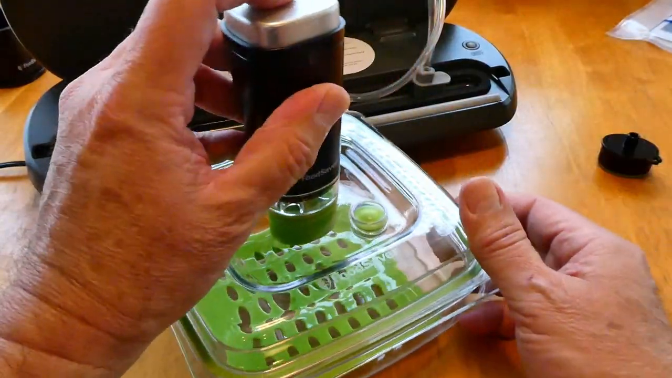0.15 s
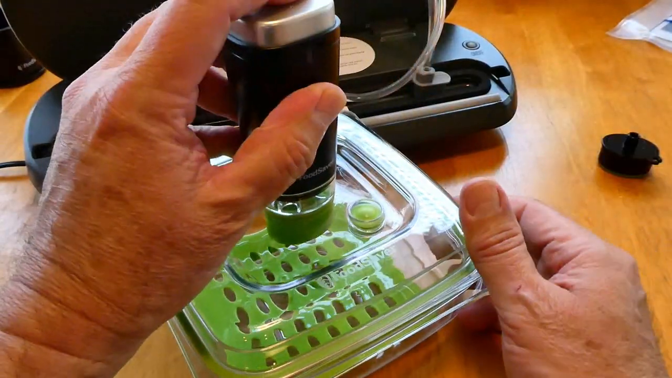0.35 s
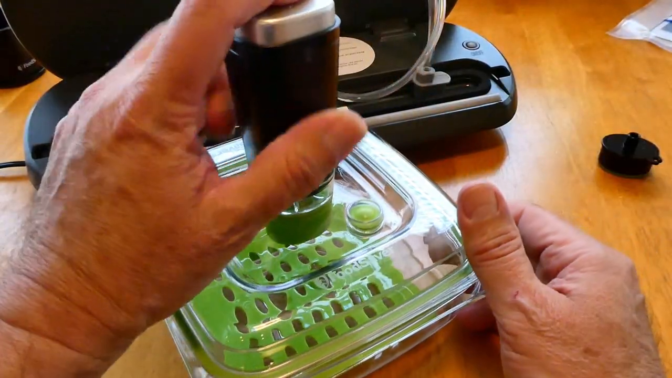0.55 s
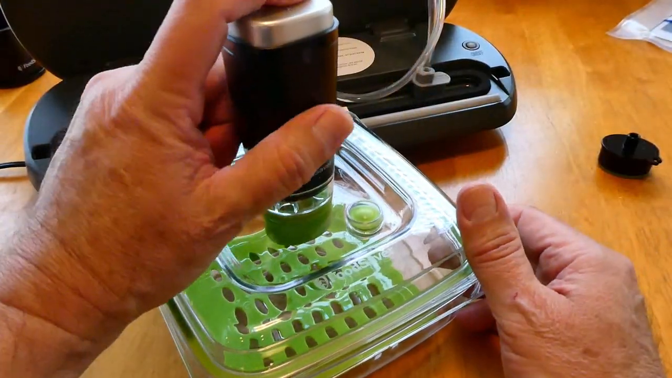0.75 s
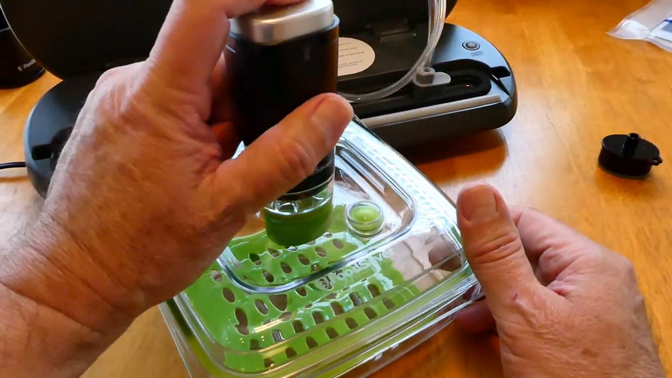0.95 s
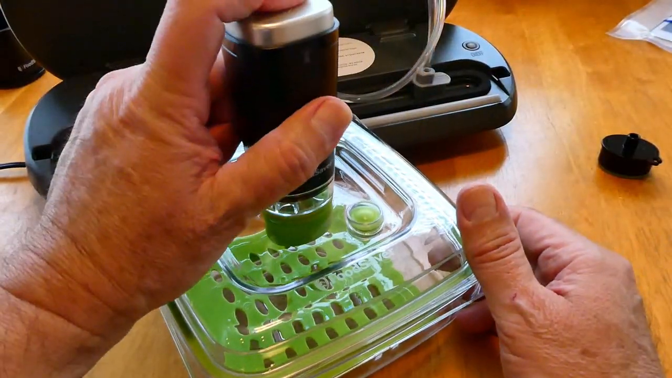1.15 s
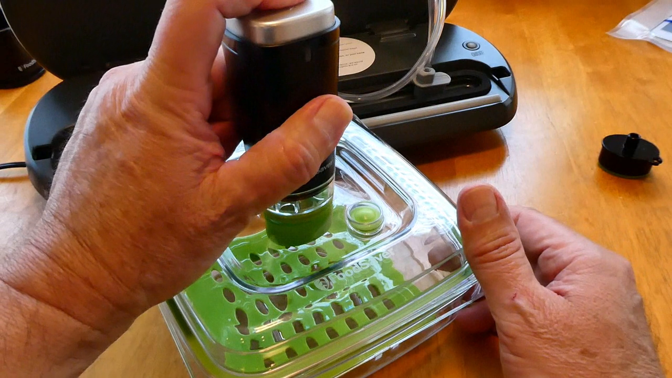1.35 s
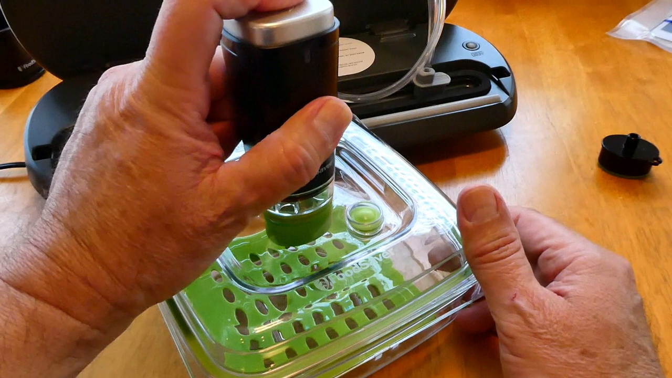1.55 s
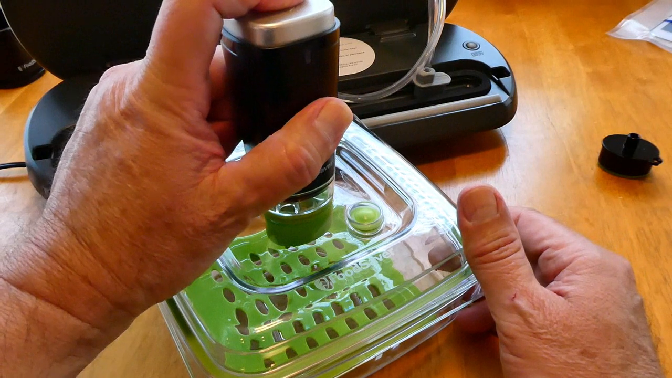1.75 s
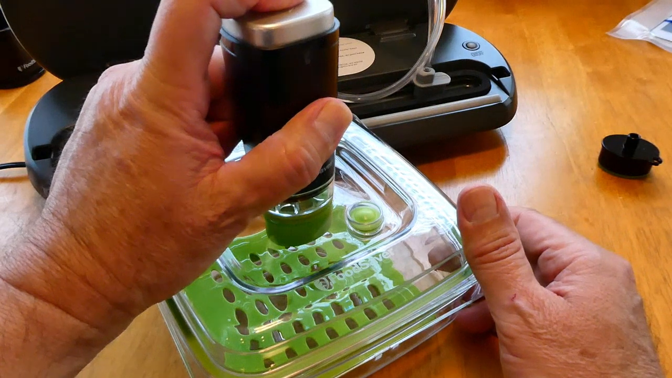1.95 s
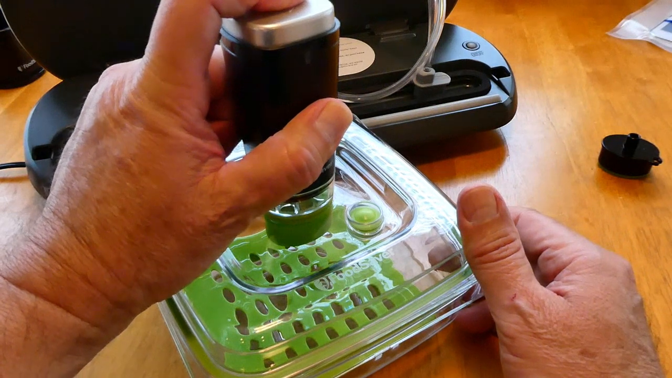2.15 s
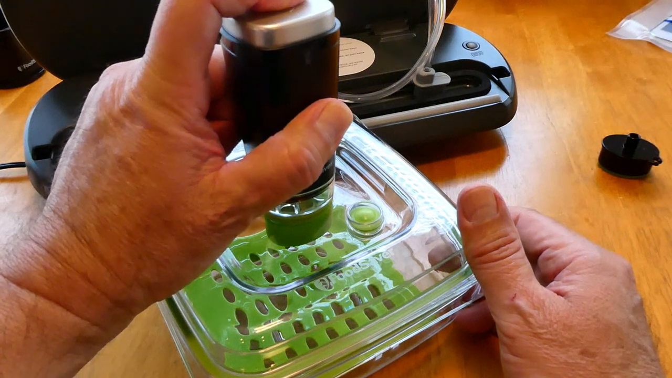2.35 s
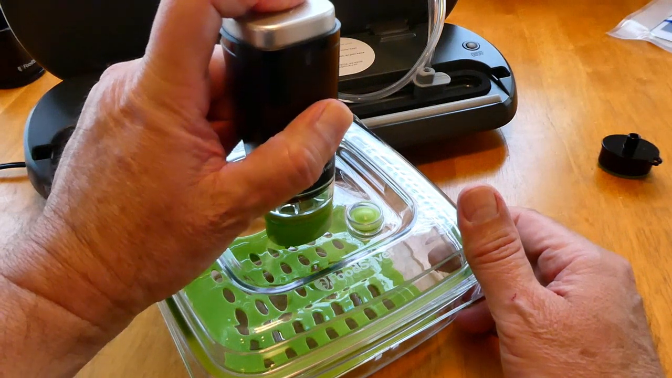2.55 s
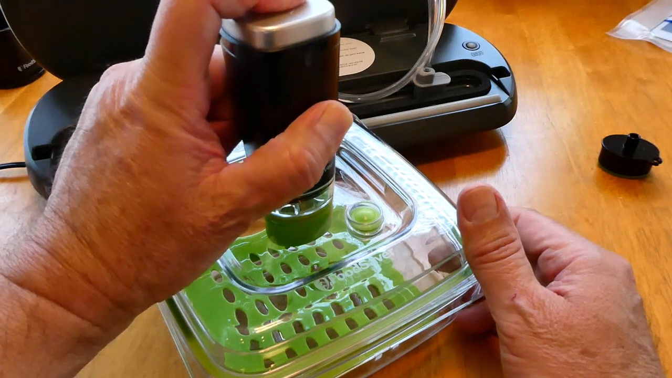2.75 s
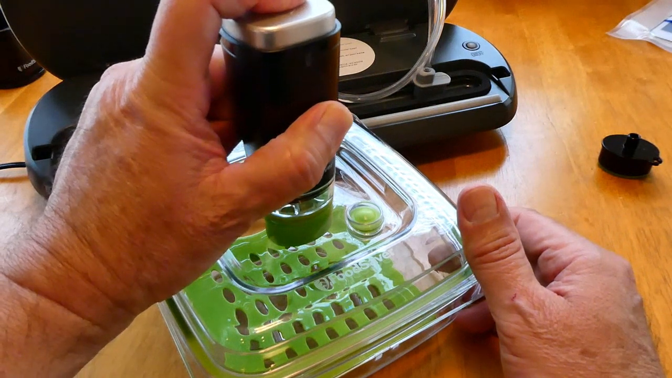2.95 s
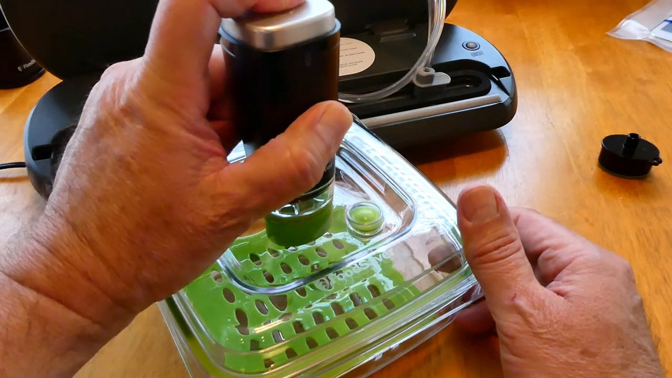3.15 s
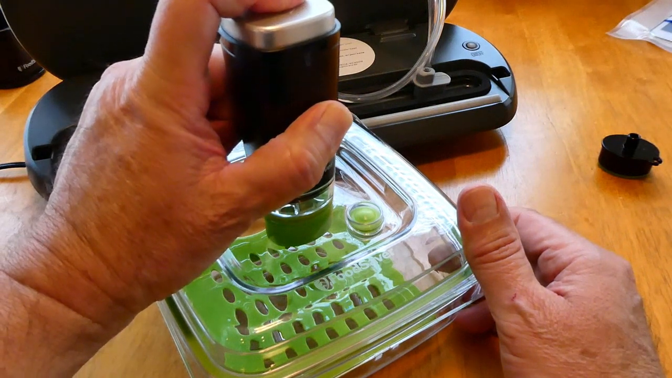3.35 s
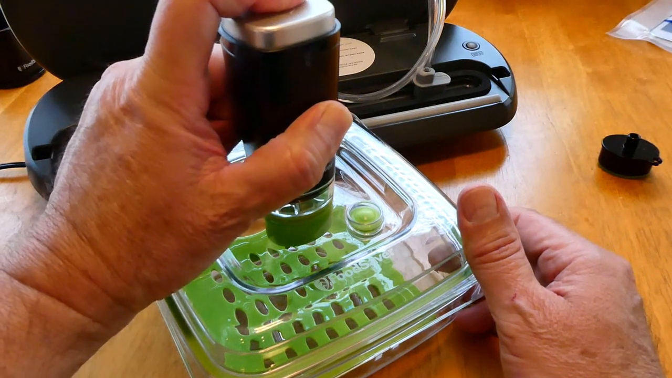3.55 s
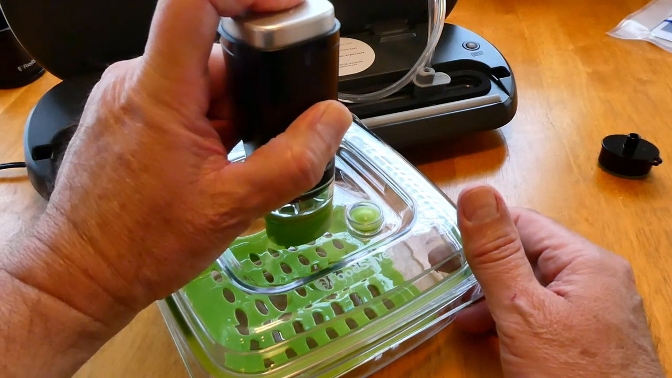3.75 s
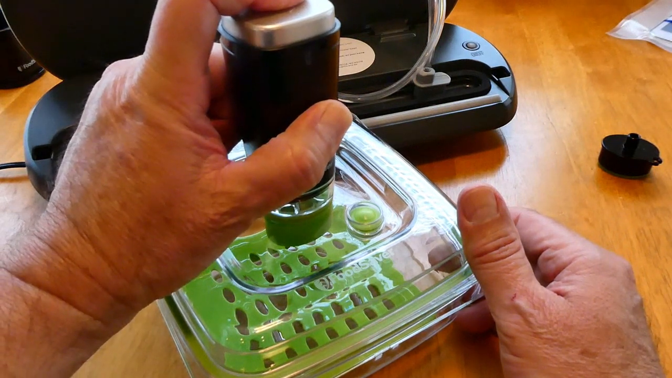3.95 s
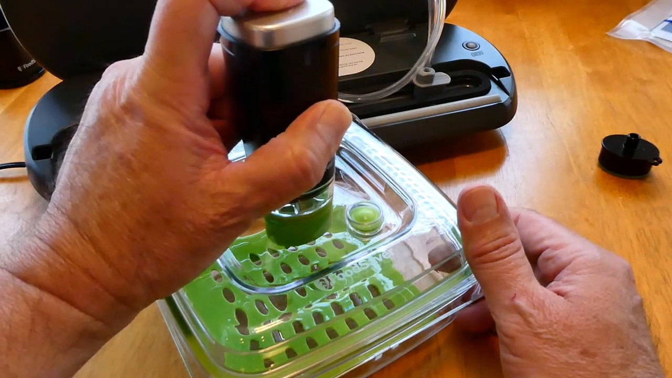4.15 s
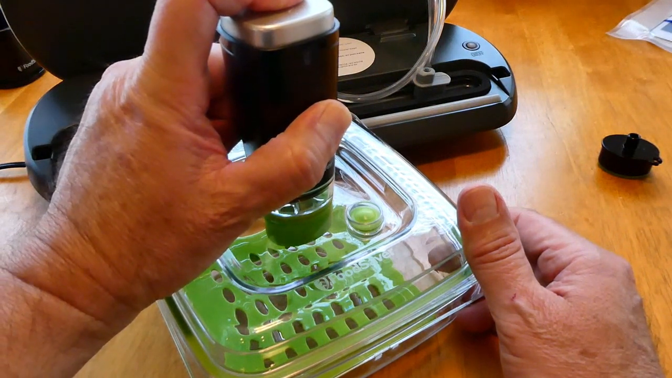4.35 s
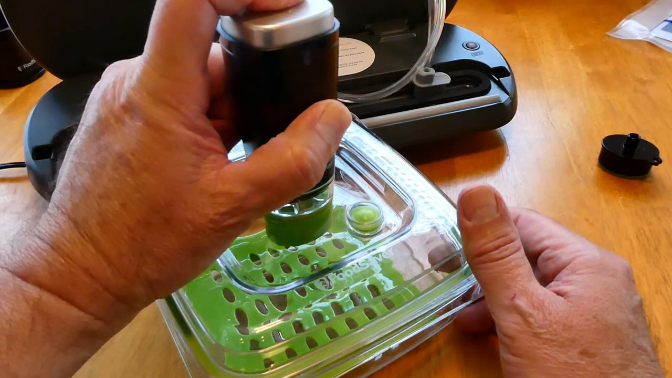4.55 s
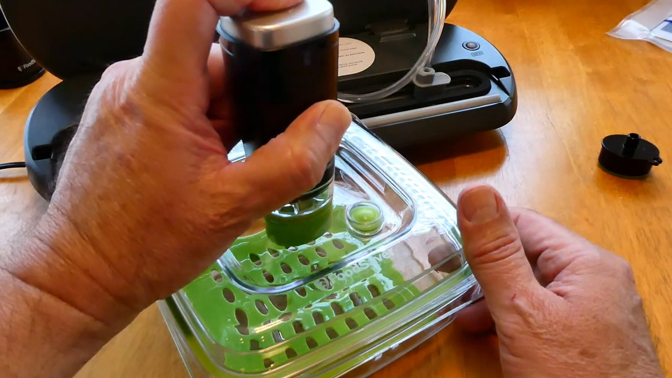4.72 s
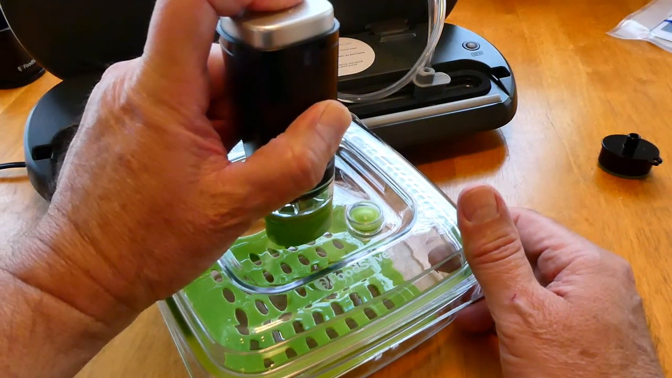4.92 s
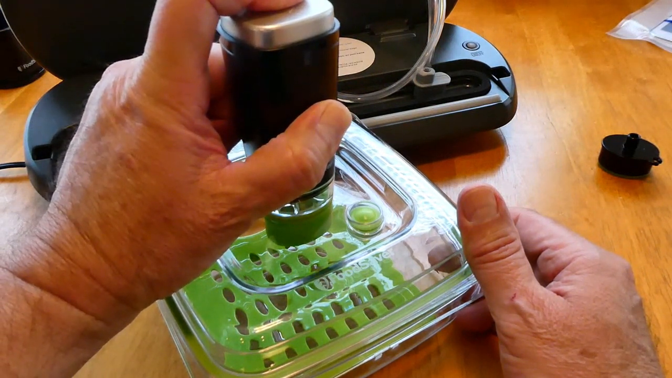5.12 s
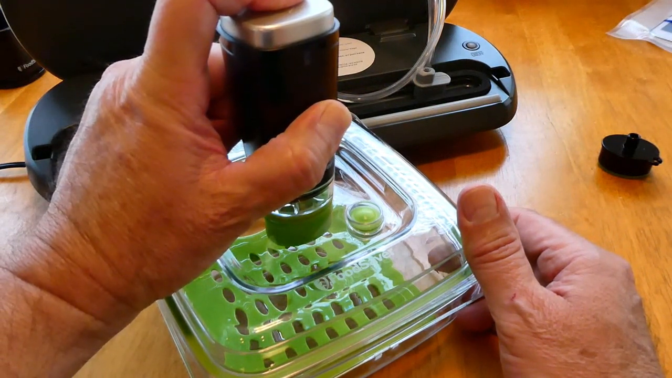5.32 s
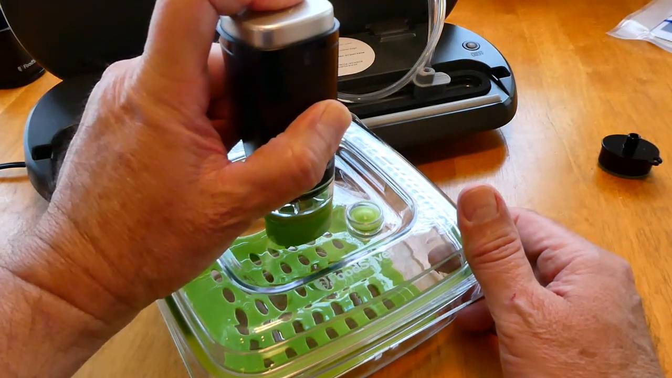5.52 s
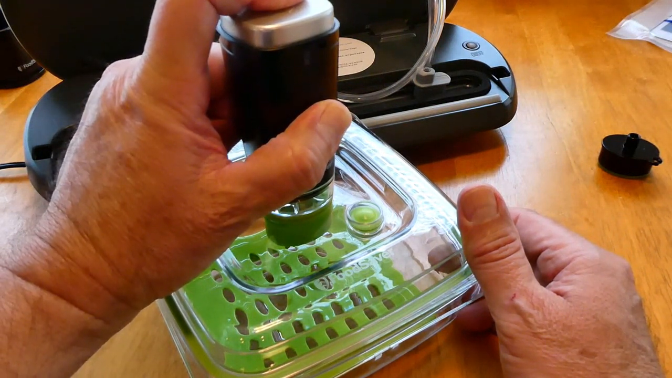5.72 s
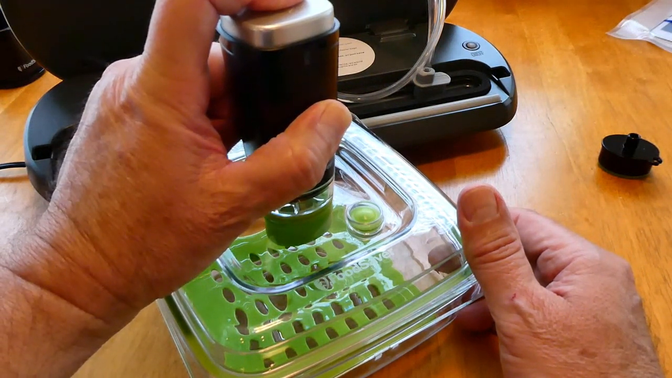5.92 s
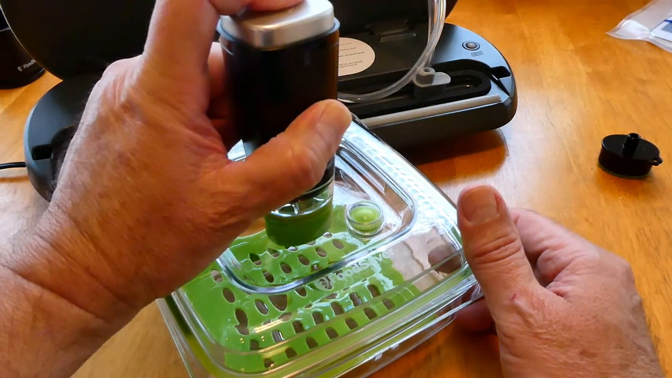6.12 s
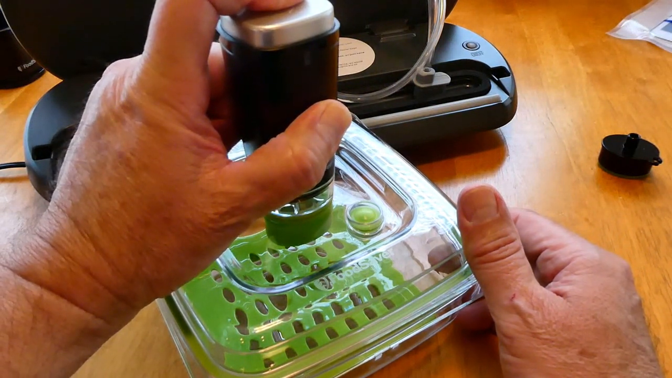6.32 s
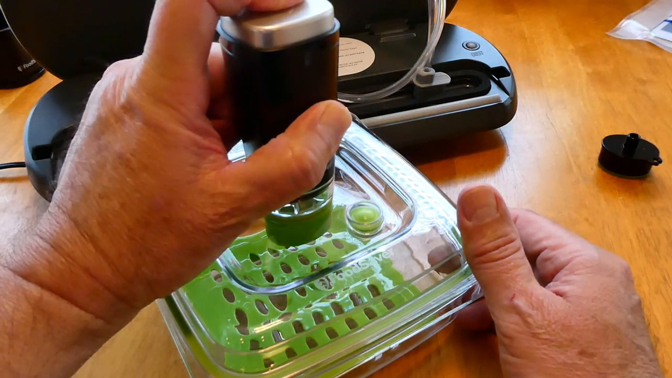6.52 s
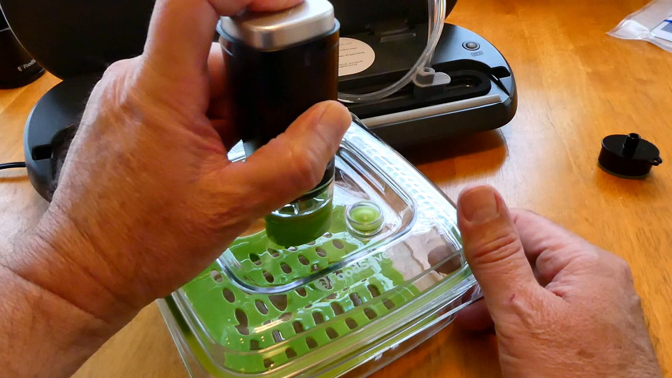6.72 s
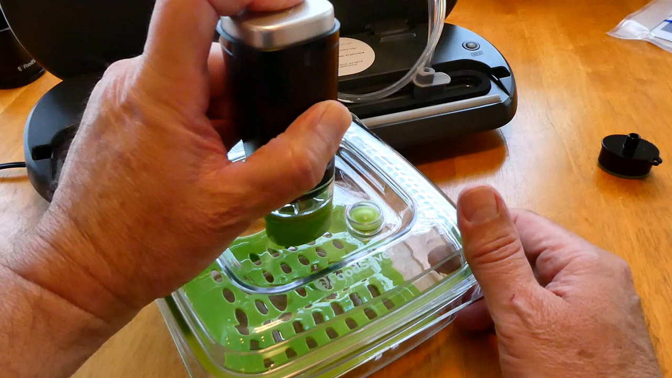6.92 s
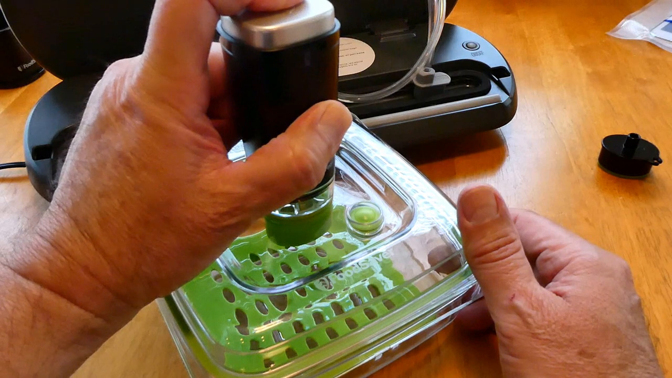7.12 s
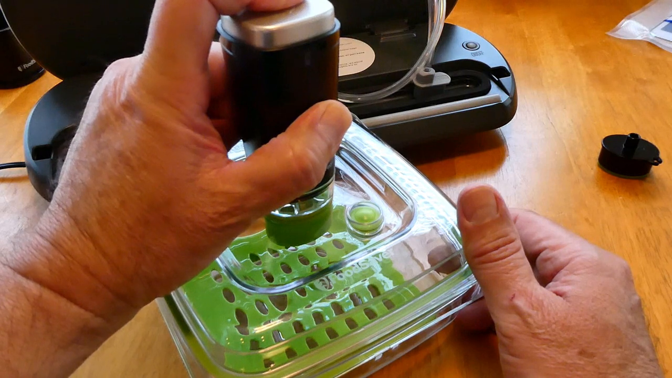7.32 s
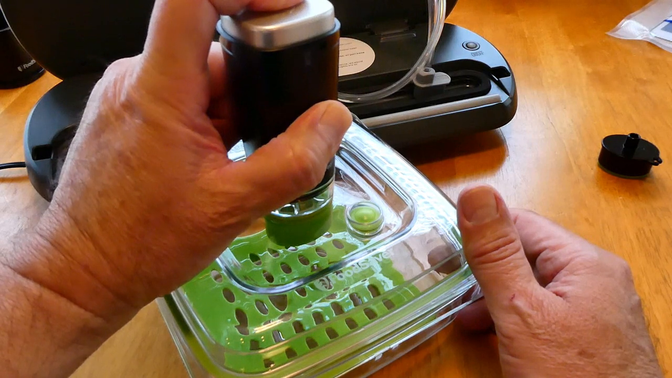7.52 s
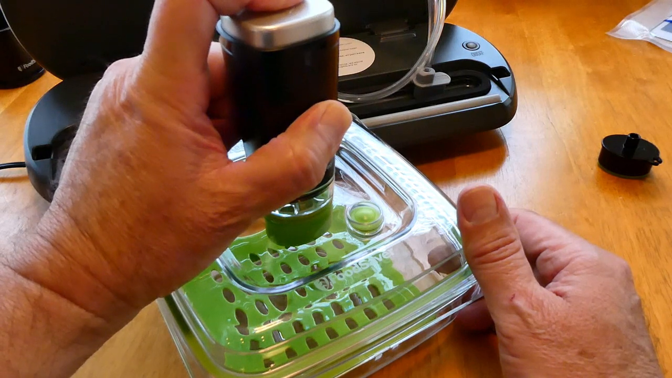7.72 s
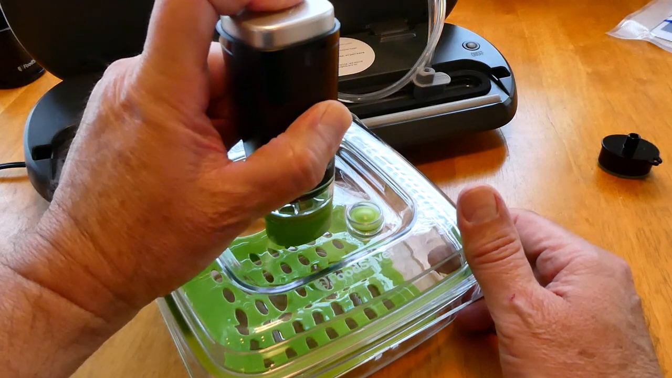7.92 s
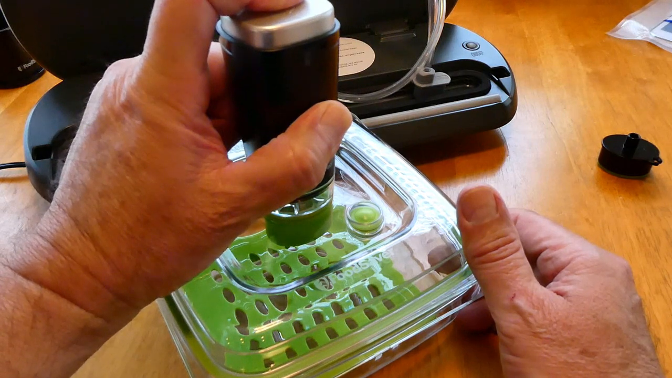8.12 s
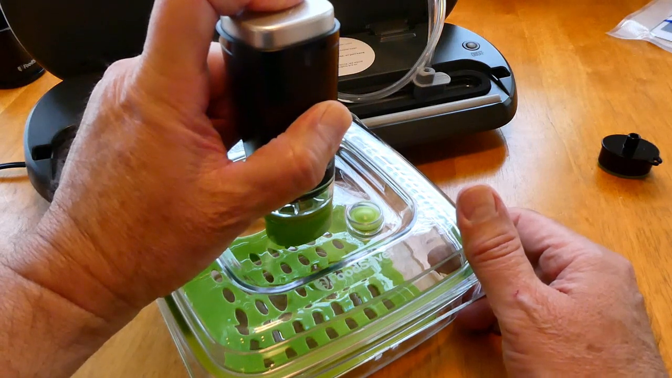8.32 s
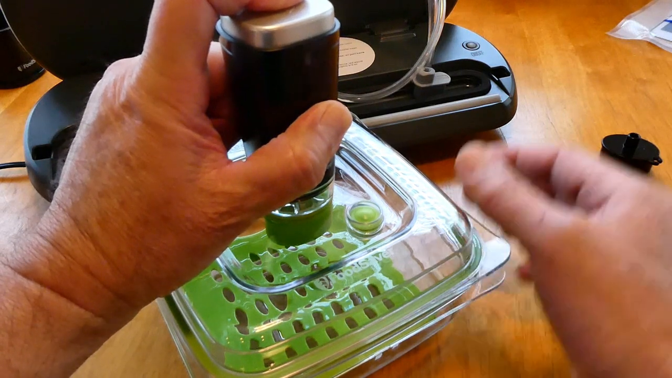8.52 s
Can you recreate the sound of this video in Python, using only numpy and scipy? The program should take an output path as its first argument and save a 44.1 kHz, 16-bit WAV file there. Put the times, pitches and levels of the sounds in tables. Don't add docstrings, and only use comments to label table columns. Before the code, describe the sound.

Fingers rub and tick on a plastic food box, then a small handheld vacuum pump starts and buzzes steadily with airy hiss, close up indoors.

```python
import sys
import numpy as np
from scipy import signal
from scipy.fft import rfft, irfft, next_fast_len
from scipy.io import wavfile
from scipy.ndimage import uniform_filter1d, map_coordinates

SR = 44100
rng = np.random.default_rng(int(sys.argv[2]) if len(sys.argv) > 2 else 0)


def waveform_to_disk(signal):
    frames = np.transpose(np.atleast_2d(signal))
    scaled = np.clip(frames, -1, 1) * 32767
    samples = np.round(scaled).astype(np.int16)
    wavfile.write(sys.argv[1], SR, samples)


def volts_from_decibels(level):
    exponent = np.asarray(level, float) / 20
    return 10 ** exponent


N = 377937

# f/Hz, density/dB [dB per Hz]
ROOM_SPECTRUM = [(25, -38), (110, -11), (150, -2), (200, -3), (295, 2.5), (450, -2.5), (730, -2.5),
                 (1120, -10.5), (2000, -10.5), (2800, -15), (3600, -23.5), (6000, -29), (9000, -30.5),
                 (15800, -33)]
ROOM_DB = -46
# f/Hz, correlation [-1 to 1]
CORRELATION = [(60, -0.87), (130, -0.31), (290, 0.52), (640, 0.064), (1410, 0.59), (3100, 0.87),
               (6820, 0.92), (15000, 0.7)]

# f/Hz, level/dB, t60/s
BOX_MODES = [(371, -2, 0.72), (756, -4, 1.9), (883, -1, 0.63), (1030, -5, 0.23), (1093, 2.5, 1.1)]
# t/s, rub level/dB, rustle level/dB, t60/s
GRIPS = [
    (0, -37.5, -47, 1.28),
    (0.106, -70, -50, 0.53),
    (0.54, -49, -60, .25),
    (0.72, -41.5, -63, 0.13),
    (0.888, -56, -66, 0.14),
]
GRIP_ATTACK_S, REST_DB = 0.0028, -71
# f/Hz, density/dB [dB per Hz]
RUB_SPECTRUM = [(71, -50), (120, -10), (359, -3), (523, -8), (894, 0.5), (973, -8), (1090, -6),
                (1420, -8.5), (1970, -23), (2200, -30), (2860, -59), (4840, -120)]
RUSTLE_SPECTRUM = [(880, -33), (1500, -2), (1690, -26), (1830, -5.5), (4020, -7), (7550, -22.5),
                   (9750, -16.5), (15800, -34)]
# t/s, peak level/dB, low ring f/Hz, high ring f/Hz, high part level/dB
TICKS = [(0.054, -28.5, 2010, 5400, -8), (0.1094, -16.5, 2580, 10100, 0), (0.151, -31, 2130, 6200, -2),
         (0.251, -48, 1900, 10200, 8), (0.3275, -38.5, 1940, 8710, -5), (0.4194, -47, 2000, 5950, -31),
         (0.5397, -43.5, 2470, 10800, 5), (0.545, -43, 2750, 10500, -5), (0.557, -43, 2410, 9310, -2),
         (0.5702, -53, 2710, 10600, 14), (0.598, -43.5, 2090, 5210, 7), (0.6515, -37, 3300, 8550, 2),
         (0.722, -33, 2010, 5240, -20)]
# f/Hz, t60/s
LID_RING = (2130, 0.25)
# t/s, peak level/dB, ring f/Hz
THUDS = [
    (0.058, -24, 230),
    (0.085, -30, 250),
    (0.132, -26.5, 236),
    (0.553, -27.5, 298),
    (0.72, -34, 592),
    (0.886, -30, 299),
]

# t/s, f/Hz [turns per second]
SPEED = [(1.03, 57.6), (1.05, 58.0), (1.13, 61.4), (1.2, 62.6), (1.36, 64.6), (1.53, 64.6), (1.62, 65.5),
         (2.12, 66.6), (2.71, 67.0), (3.07, 66.8), (3.36, 67.1), (4.56, 67.3), (4.66, 67.1), (6.01, 67.1),
         (6.13, 67.0), (6.59, 67.2), (7.27, 67.0), (8.57, 67.0)]
STEADY_HZ, EVEN_HZ = 64.6, 64.9
START_S = 1.03
VALVE_BLOWS = [(0.159, 0.17, 0.65, 0.94), (0.194, 0.0, 0.85, -0.79), (0.444, -0.29, -0.23, 0.53),
               (0.6, -0.12, -0.46, -0.93)]
# f/Hz, width/Hz
PART_MODES = [
    (923, 152),
    (2369, 290),
    (2142, 150),
]
# f/Hz, width/Hz, level/dB
HOUSING_MODES = [(930, 110, 0), (1300, 150, -9), (1750, 160, -6), (2660, 200, -1)]
# t/s, buzz level/dB
PRESS = [
    (1.03, -45.5),
    (1.13, -37),
    (1.45, -35),
    (2.19, -36),
    (2.98, -35),
    (3.8, -35.5),
    (5.65, -36.5),
    (7.25, -35.5),
    (8.57, -35.5),
]
# multiple of shaft speed, level/dB, change while lid is slack/dB, change as box empties/dB
STRONG_ORDERS = [(3, -9, -2, 1), (6, -11, -4, -1), (9, -16, 11, 3), (10, -11, -8, -3), (11, -8, -12, -5),
                 (12, -5, 2, 2), (13, -7, -8, -3), (14, 2, 0, -8), (15, -5, 2, 5), (16, -20, 4, 8),
                 (17, -11, -12, 2), (18, -9, -9, 3), (19, -21, 13, 2), (20, -19, 6, 14), (21, -3, -5, -5),
                 (23, -7, 2, -1), (24, -9, -6, -13), (29, -20, 7, 8), (32, -19, 1, 11), (33, -9, 3, -8),
                 (34, -3, -3, 0), (35, -7, 0, -8), (36, -9, 0, 2), (37, -4, 0, 2), (39, 1, -8, -3),
                 (40, -2, -5, -6), (41, -4, 2, 1), (42, -16, 10, 1), (43, -15, 3, 1), (45, -18, 7, 9)]
WEAK_DB, WEAK_FROM, WEAK_TO = -21, 25, 47
SEAL_S, PULL_DOWN_S, EMPTY_S = 1.7, 0.4, 8.5
LOOSE_S, LOOSE_SHARE = 1.57, 0.23
# f/Hz, density/dB [dB per Hz]
AIR_SPECTRUM = [(90, -18.5), (200, -9), (450, -5.5), (900, -2.5), (1150, -2.5), (1350, -1.5), (1700, -8),
                (2100, -5), (2450, -7.5), (2750, -0.5), (3050, -6), (3200, -29), (4200, -44)]
AIR_DB, AIR_BEAT_DB, AIR_LAG, AIR_LUMP_DB = -8, -0.5, 0.57, 0.4
# f/Hz, density/dB [dB per Hz]
HISS_SPECTRUM = [(2400, -40), (3200, -3), (3600, -3), (3930, -6.5), (4520, -3), (5600, -5.5), (6700, 1),
                 (7250, -9), (9180, -7.5), (10100, -9), (10900, 1), (11550, -6), (12300, -2.5), (13600, -5)]
HISS_DB, HISS_DB_PER_TURN = -42.5, 0.48
# f/Hz, density/dB [dB per Hz]
WHISTLE_SPECTRUM = [(13200, -60), (13500, -19), (14000, -14), (14500, -11), (14650, -3), (14850, 0),
                    (15050, -5), (15250, -11), (15400, -30), (15750, -30), (15850, -90)]
# f/Hz, left minus right level/dB
LEAN = [(60, 1), (110, -9), (200, 0.5), (380, 2), (700, -1), (1290, -2), (2380, 0.5), (4400, 0),
        (8120, -0.5), (15000, 1.5)]
# t/s, peak level/dB, ring f/Hz
CREAKS = [
    (1.977, -25, 8500),
    (2.593, -23, 11000),
]

# f/Hz, width/Hz, level/dB
NOTCHES = [(7150, 70, -9), (9700, 60, -15), (13330, 90, -10), (15600, 200, -14)]
TOP_HZ = 15600

SECONDS = np.arange(N) / SR
BURST_S = np.arange(SR // 4) / SR


def unit(x):
    return x / np.sqrt(np.mean(x ** 2) + 1e-20)


def along(points, hz):
    f, v = np.transpose(points)
    return np.interp(np.log(hz + 1), np.log(f + 1), v)


def curve(rows):
    s, values = np.transpose(rows)
    return np.interp(SECONDS, s, values)


def wobble(rate):
    knots = rng.standard_normal(int(N * rate / SR) + 4)
    return map_coordinates(knots, [np.arange(N) * rate / SR], order=1) * np.sqrt(3 / 2)


def filtered(x, response):
    m = next_fast_len(N + 8192)
    return irfft(rfft(x, m) * response(np.fft.rfftfreq(m, 1 / SR)), m)[..., :N]


def rush(spectrum, gate=1, wide=1):
    def mid_side_gains(hz):
        angle = np.arccos(np.clip(along(CORRELATION, hz) * wide, -1, 1)) / 2
        return volts_from_decibels(along(spectrum, hz)) * [np.cos(angle), np.sin(angle)]

    mid, side = filtered(gate * rng.standard_normal((2, N)), mid_side_gains)
    return unit(np.array([mid + side, mid - side]))


def ring(hz, t60, t):
    return volts_from_decibels(-60 * t / t60) * np.sin(2 * np.pi * hz * t)


def add_at(out, s, sound):
    start = round(s * SR)
    out[:, start:start + sound.shape[-1]] += sound


def room_tone():
    return volts_from_decibels(ROOM_DB - 1.5) * rush(ROOM_SPECTRUM, wide=0.45)


def box_ringing():
    out = np.zeros((2, N))
    modes = sum(volts_from_decibels(db - 30 * BURST_S / 0.58) * ring(hz, t60, BURST_S) for hz, db, t60 in BOX_MODES)
    add_at(out, 0, volts_from_decibels(-43.0) * modes)
    return out


def grip_gains():
    gain = np.full((2, N), volts_from_decibels(REST_DB))
    for s, rub_db, rustle_db, t60 in GRIPS:
        t = np.clip(SECONDS - s, 0, None)
        decay = volts_from_decibels(np.array([[rub_db], [rustle_db]]) - 60 * t / t60)
        gain += decay * (1 - np.exp(-t / GRIP_ATTACK_S))
    return gain


def finger_friction():
    rub_gain, rustle_gain = grip_gains()
    off = np.clip((1.05 - SECONDS) / 0.063, 0, 1)
    rub = rub_gain * rush(RUB_SPECTRUM, volts_from_decibels(2.0 * wobble(50.4)))
    rustle = rustle_gain * rush(RUSTLE_SPECTRUM, volts_from_decibels(2.1 * wobble(60)), wide=0.89)
    return off * (rub + rustle)


def plastic_ticks():
    out, t = np.zeros((2, N)), BURST_S
    for s, db, low_hz, high_hz, high_db in TICKS:
        pan_db = rng.normal(-1, 1.5)
        crack = rng.standard_normal(len(t)) * (volts_from_decibels(-60 * t / 0.0054) + 0.061 * volts_from_decibels(-60 * t / 0.23))
        band = signal.butter(2, [1800, high_hz * 1.25], "bandpass", fs=SR)
        crack = signal.lfilter(*band, crack)
        high_part = 0.6 * ring(high_hz, 0.005, t) + 1.7 * crack
        tick = 0.9 * ring(low_hz, 0.011, t) + volts_from_decibels(high_db) * high_part
        tick *= 1 - np.exp(-t / 0.00023)
        tick[48:] += 0.5 * tick[:-48]
        add_at(out, s, volts_from_decibels(db - 2.5 + np.array([[pan_db], [-pan_db]]) / 2) * tick)
    return out


def table_thuds():
    out = np.zeros((2, N))
    for s, db, hz in THUDS:
        add_at(out, s, volts_from_decibels(db - 5) * ring(hz, 0.1, BURST_S) * (1 - np.exp(-BURST_S / 0.013)))
    return out


def lid_ringing():
    out = np.zeros((2, N))
    hardest_s = TICKS[1][0]
    add_at(out, hardest_s, volts_from_decibels(-42) * ring(*LID_RING, BURST_S))
    return out


def mode(hz, centre, width):
    return 1j * hz * width / (centre ** 2 - hz ** 2 + 1j * hz * width)


def housing(hz):
    return 0.08 + sum(volts_from_decibels(db) * np.abs(mode(hz, c, w)) ** 1.5 for c, w, db in HOUSING_MODES)


def buzz(turns, speed):
    slack = np.exp(-np.clip(SECONDS - SEAL_S, 0, None) / PULL_DOWN_S)
    empty = (SECONDS - 1) / (EMPTY_S - 1)
    run_up = np.flatnonzero(speed < STEADY_HZ)
    uneven_db = 0.5 + 1.2 * np.clip(EVEN_HZ - speed, 0, 3)
    loose = LOOSE_SHARE * np.clip((LOOSE_S - SECONDS) / 0.067 + 1, 0, 1)
    strong = [k for k, *_ in STRONG_ORDERS]
    weak = [(k, WEAK_DB, 0, 0) for k in range(WEAK_FROM, WEAK_TO + 1) if k not in strong]
    out = np.zeros((2, N))
    for k, db, slack_db, empty_db in list(STRONG_ORDERS) + weak:
        rings = [mode(k * speed[-1], c, w) for c, w in PART_MODES]
        blows = sum(np.dot(push, rings) * np.exp(-2j * np.pi * k * place) for place, *push in VALVE_BLOWS)
        wander_db = 1.0 * wobble(2.5) + uneven_db * wobble(25)
        level = volts_from_decibels(db + slack_db * slack + empty_db * empty + wander_db)
        steady_gain = housing(k * STEADY_HZ)
        level[run_up] *= housing(k * speed[run_up]) / steady_gain
        level *= (steady_gain + 0.25 + 0.4 * (k < 10)) ** loose
        scatter, spread = rng.normal(0, [0.004 * k, 0.15])
        drift = (0.08 + 0.004 * k) * wobble(2.5)
        phase = 2 * np.pi * k * turns + np.angle(blows) + scatter + drift
        out += level * np.cos(phase + [[spread], [-spread]])
    return out / np.sqrt(uniform_filter1d(np.mean(out ** 2, 0), SR // 4) + 1e-9)


def pulsed_noise(spectrum, turns, depth_db, lag, lump_db, wide=1):
    beat = volts_from_decibels(depth_db * np.cos(2 * np.pi * (3 * turns - lag)))
    return rush(spectrum, beat * volts_from_decibels(lump_db * wobble(90)), wide)


def valve_air(turns, speed, buzz_db):
    gain = volts_from_decibels(buzz_db + AIR_DB + 1.1 * np.clip(STEADY_HZ - speed, 0, 6))
    return gain * pulsed_noise(AIR_SPECTRUM, turns, AIR_BEAT_DB, AIR_LAG, AIR_LUMP_DB, wide=0.95)


def hiss_and_whistle(turns, speed):
    hiss_db = HISS_DB - HISS_DB_PER_TURN * (speed[-1] - speed)
    hiss = volts_from_decibels(hiss_db) * pulsed_noise(HISS_SPECTRUM, turns, 1.0, 1.0, 0.44)
    whistle_gain = volts_from_decibels(hiss_db - 6.3 - 0.8 * (67 - speed))
    whistle = whistle_gain * pulsed_noise(WHISTLE_SPECTRUM, turns, 3, 0.78, 0.9, wide=1.08)
    small_modes = rng.standard_normal(400)
    return filtered(hiss + whistle, lambda hz: volts_from_decibels(2.7 * map_coordinates(small_modes, [hz / 45])))


def pump():
    speed, buzz_db = curve(SPEED), curve(PRESS)
    on = np.clip((SECONDS - START_S) / 0.04, 0, 1)
    shake = 0.0004 + 0.0013 * np.clip(EVEN_HZ - speed, 0, 5)
    turns = np.cumsum(speed) / SR + shake * wobble(30)
    buzz_gain = volts_from_decibels(buzz_db - 1.1 - 0.25 * np.clip(STEADY_HZ - speed, 0, 6))
    tone = buzz_gain * buzz(turns, speed)
    mix = on * (tone + valve_air(turns, speed, buzz_db) + hiss_and_whistle(turns, speed))
    return filtered(mix, lambda hz: volts_from_decibels([along(LEAN, hz) / 2, -along(LEAN, hz) / 2]))


def shell_creaks():
    out = np.zeros((2, N))
    for s, db, hz in CREAKS:
        add_at(out, s, volts_from_decibels(db) * ring(hz, 0.002, BURST_S))
    return out


def scene():
    room = room_tone()
    handling = box_ringing() + finger_friction() + plastic_ticks() + table_thuds() + lid_ringing()
    handling += shell_creaks()
    thinned = filtered(handling, lambda hz: 1 / (1 + (140 / (hz + 1)) ** 4))
    return room + thinned + pump()


def top_cut(x):
    return signal.sosfilt(signal.butter(12, 16620, fs=SR, output="sos"), x)


def record(dry):
    def response(hz):
        notch_db = sum(db * np.exp(-((hz - c) / w) ** 2) for c, w, db in NOTCHES)
        return volts_from_decibels(notch_db) * (hz < TOP_HZ)

    return top_cut(filtered(dry, response))


dry = scene()
out = record(dry)
waveform_to_disk(out)
```